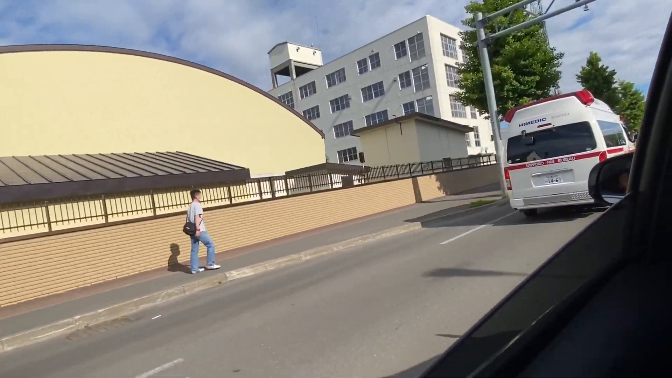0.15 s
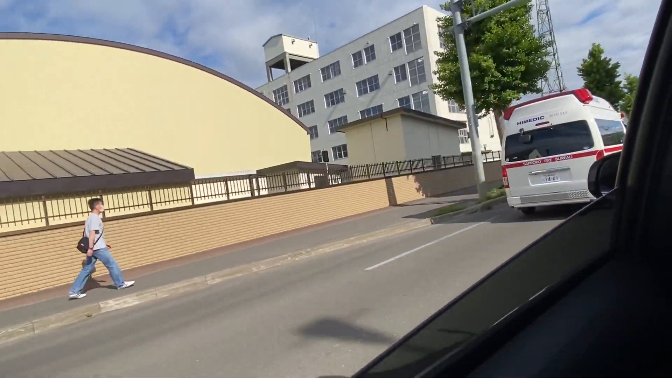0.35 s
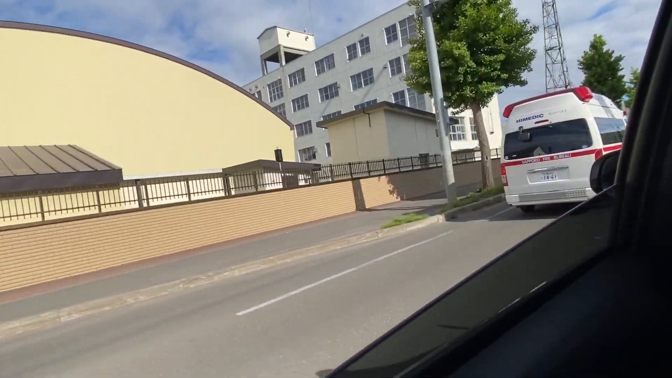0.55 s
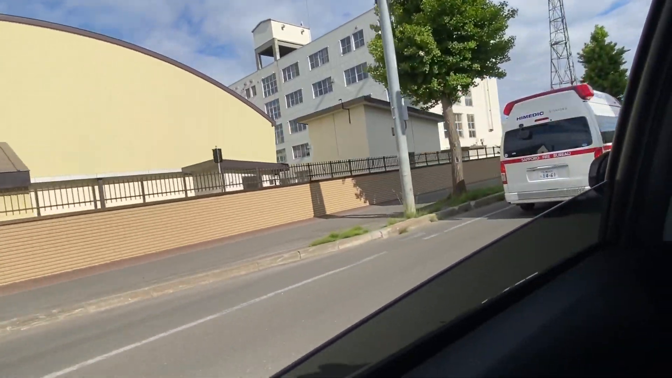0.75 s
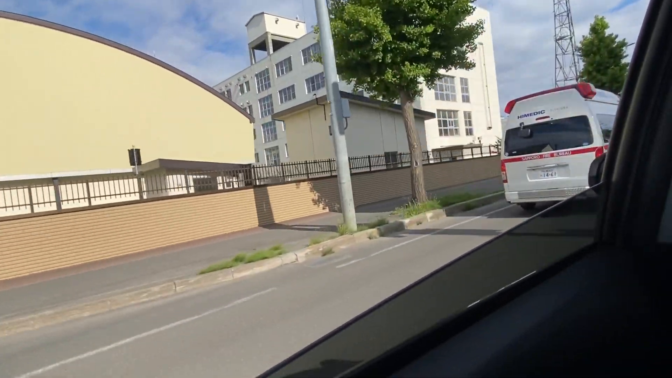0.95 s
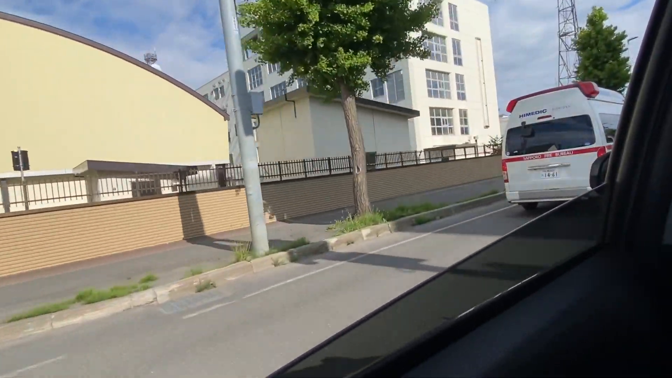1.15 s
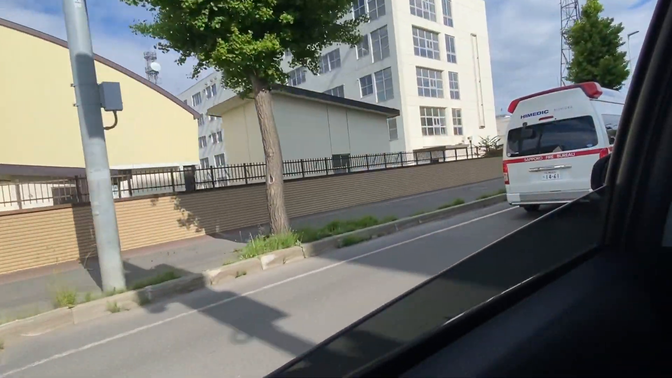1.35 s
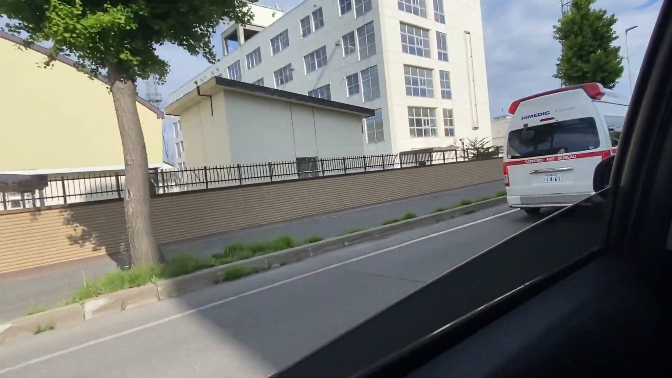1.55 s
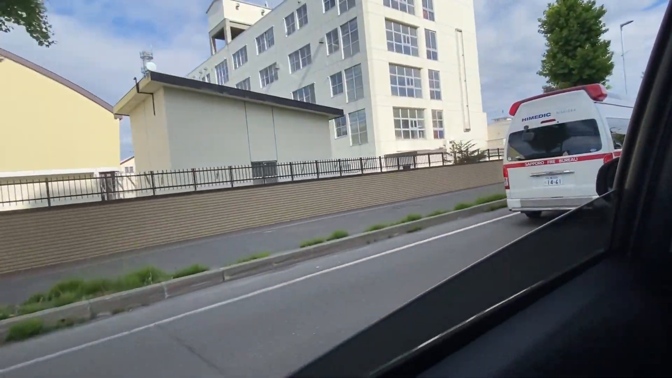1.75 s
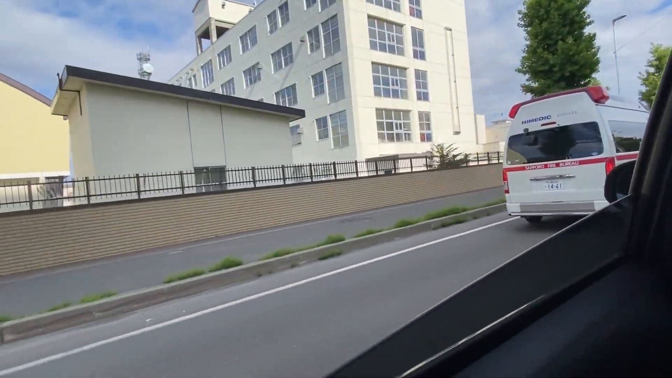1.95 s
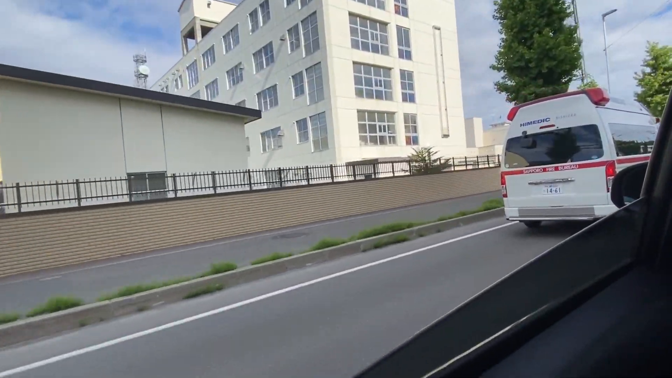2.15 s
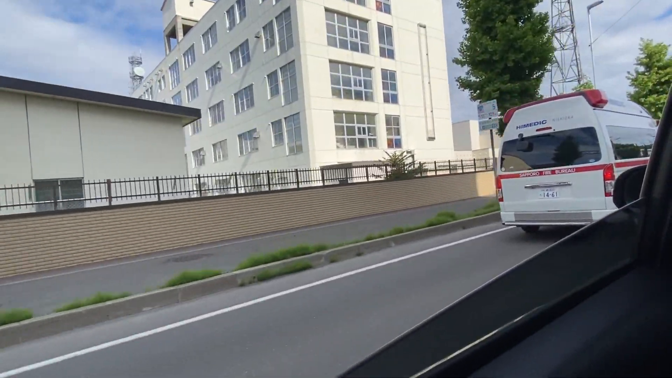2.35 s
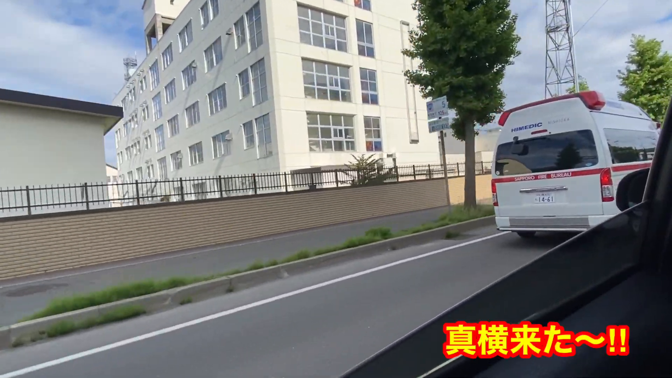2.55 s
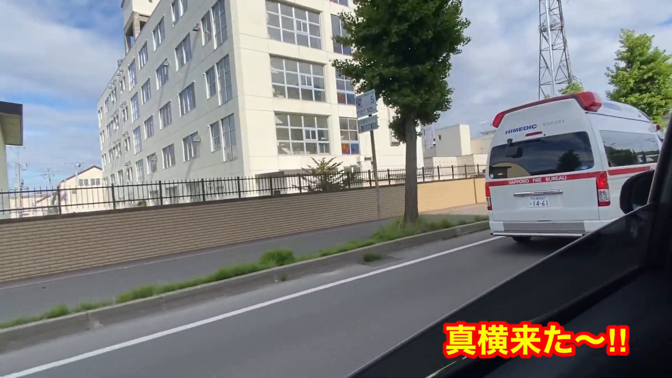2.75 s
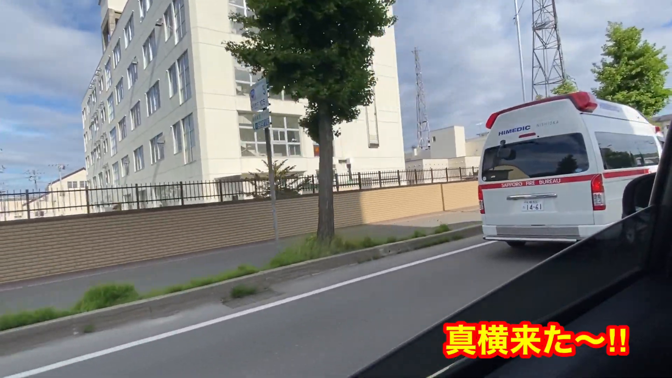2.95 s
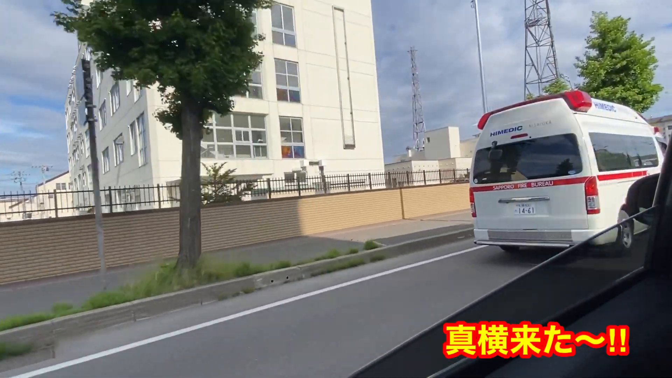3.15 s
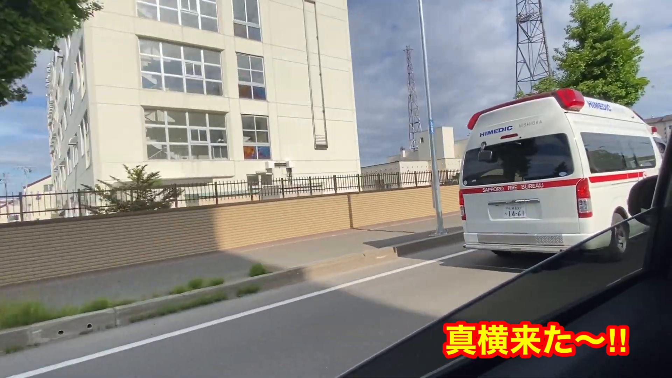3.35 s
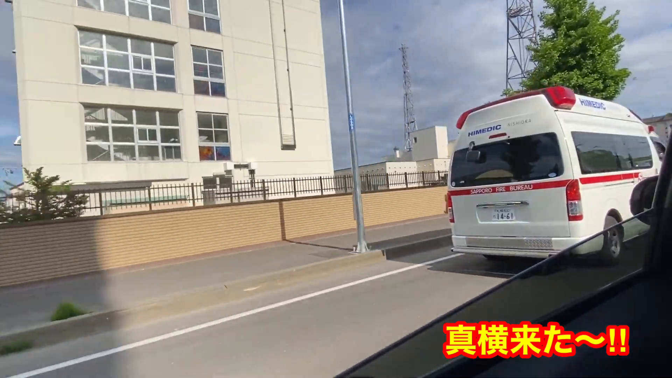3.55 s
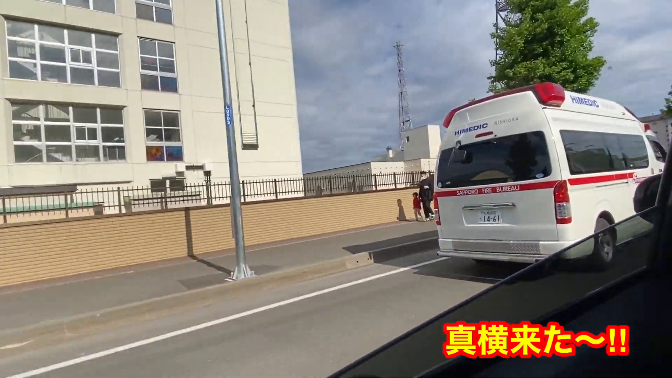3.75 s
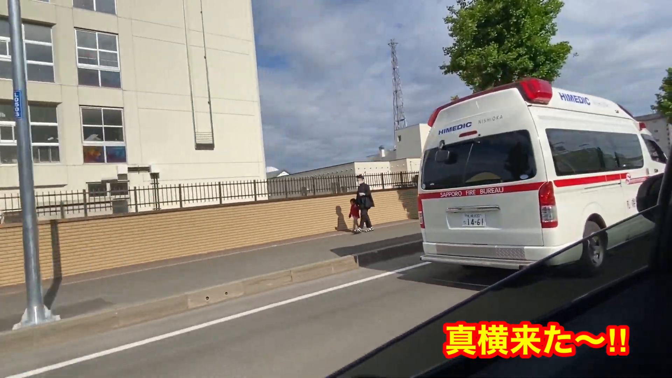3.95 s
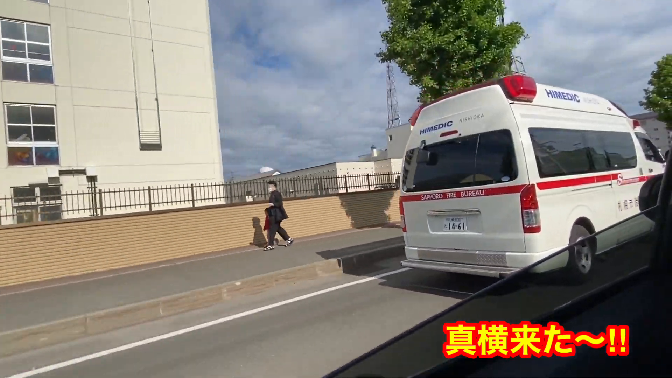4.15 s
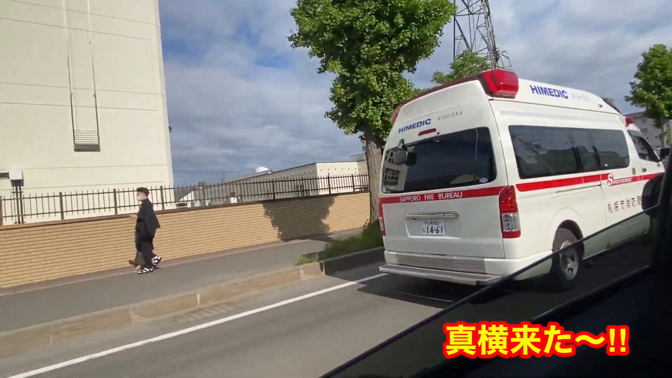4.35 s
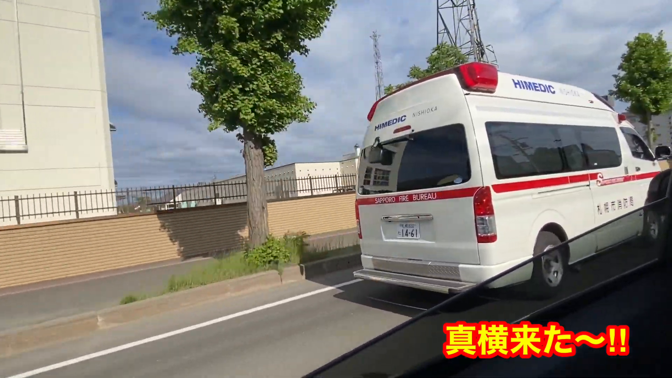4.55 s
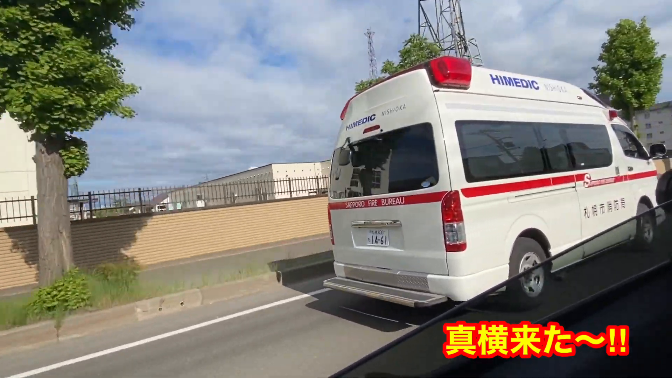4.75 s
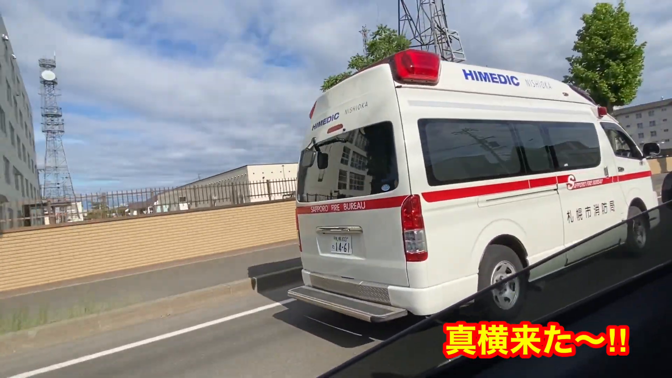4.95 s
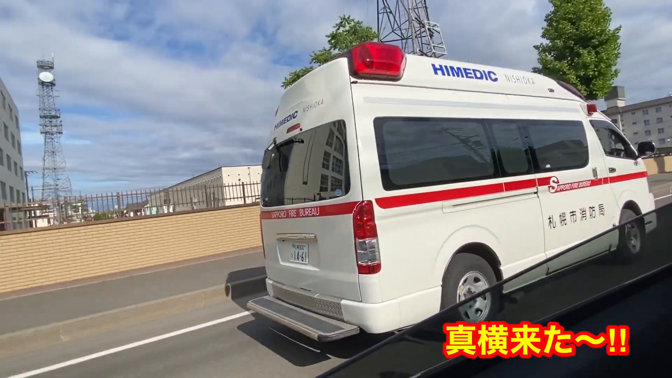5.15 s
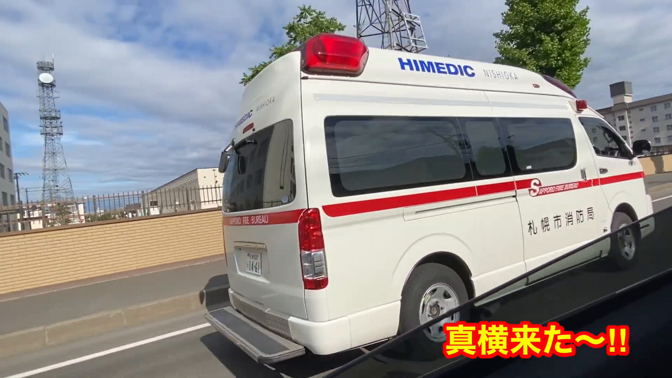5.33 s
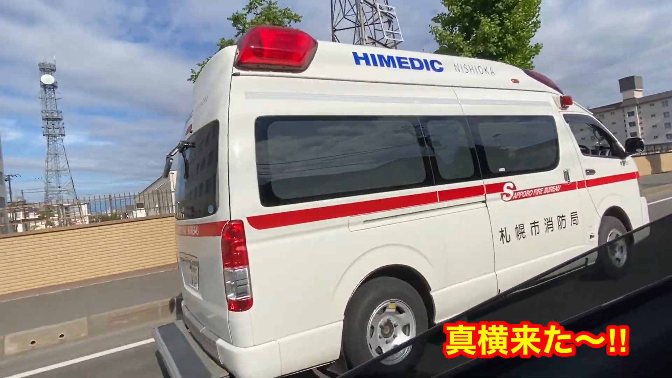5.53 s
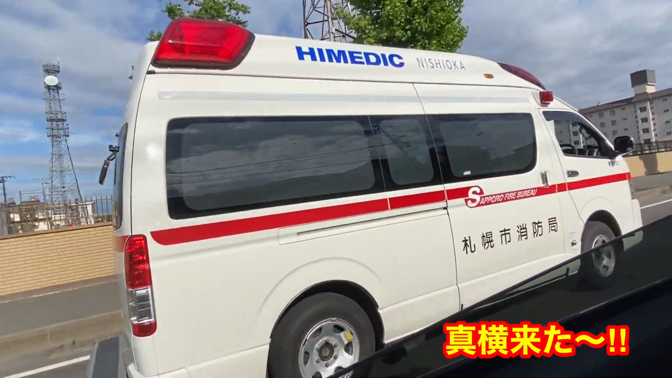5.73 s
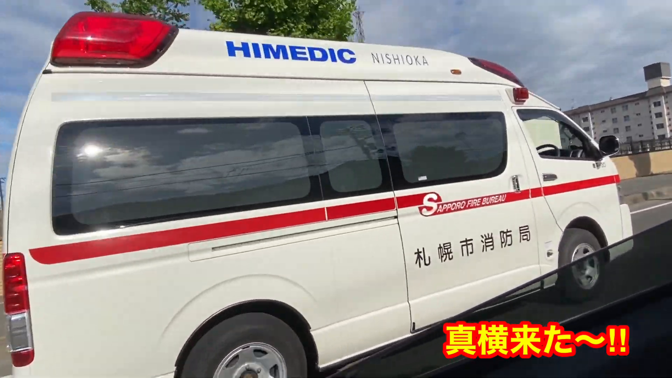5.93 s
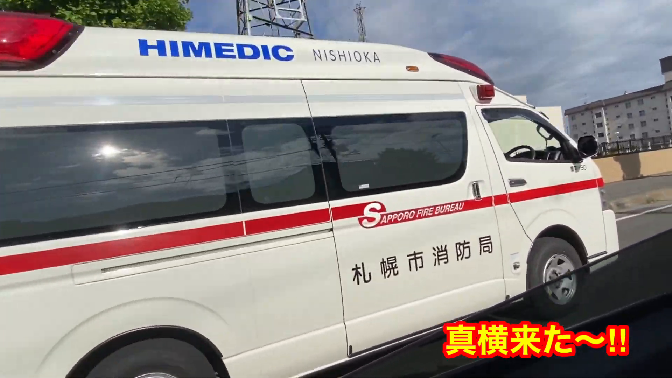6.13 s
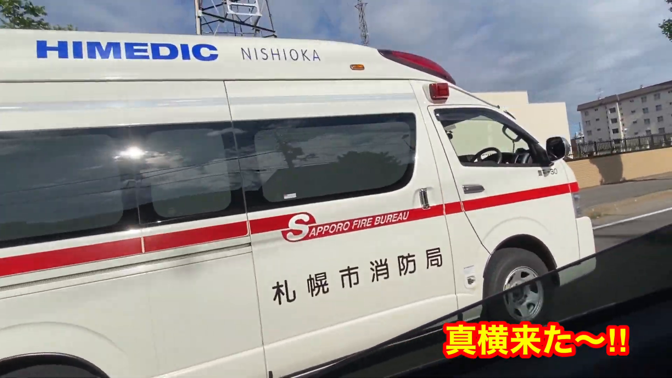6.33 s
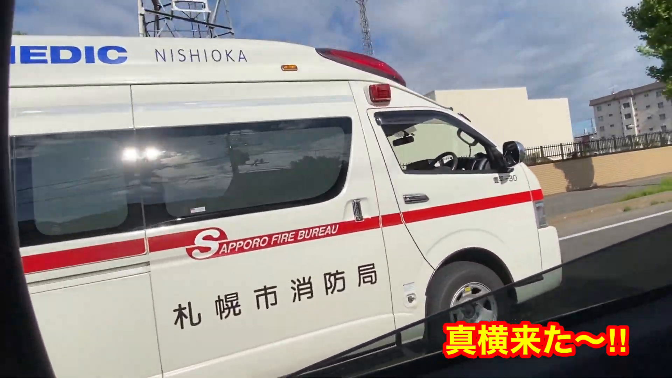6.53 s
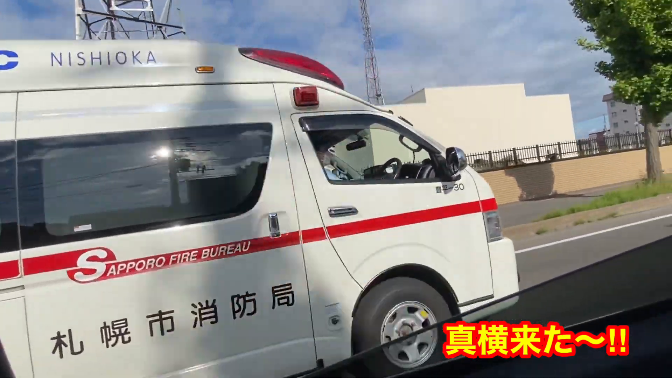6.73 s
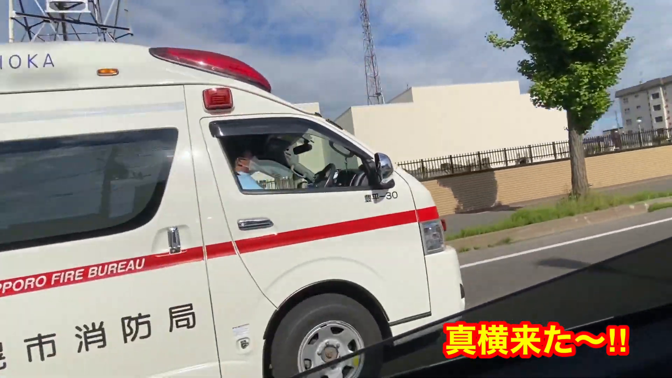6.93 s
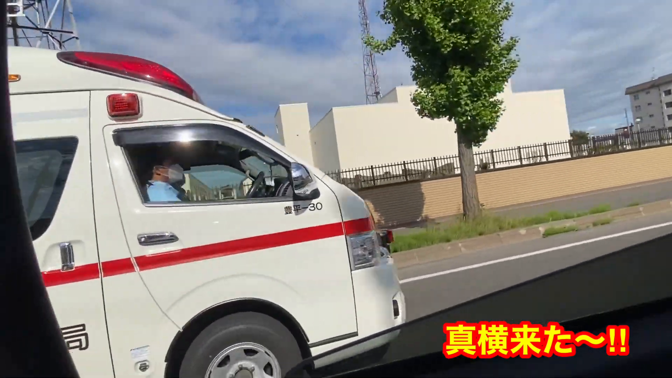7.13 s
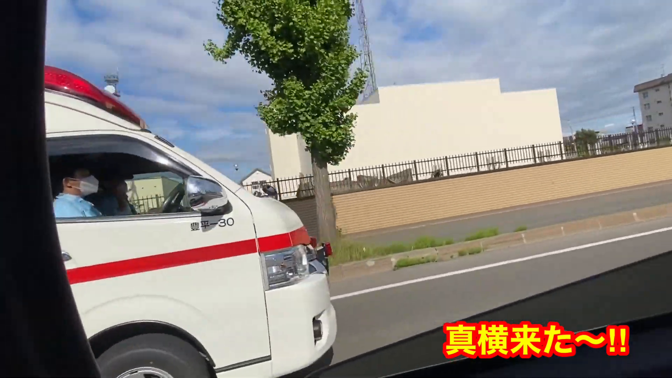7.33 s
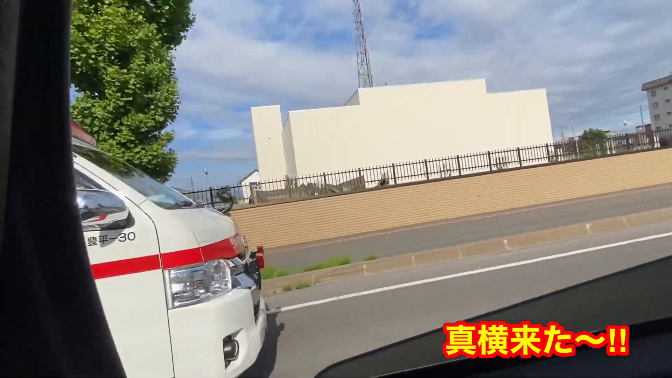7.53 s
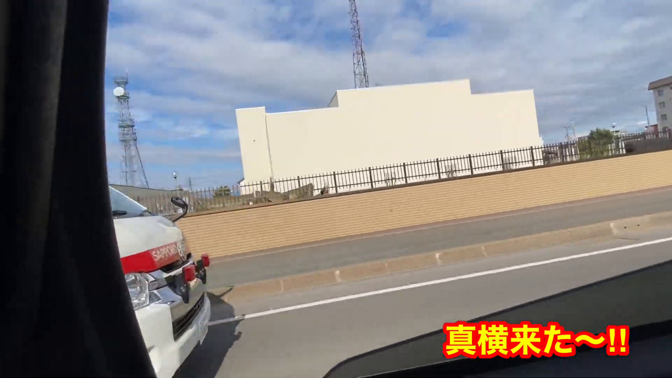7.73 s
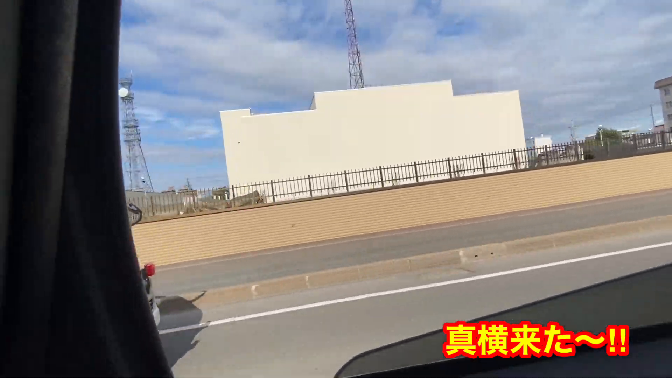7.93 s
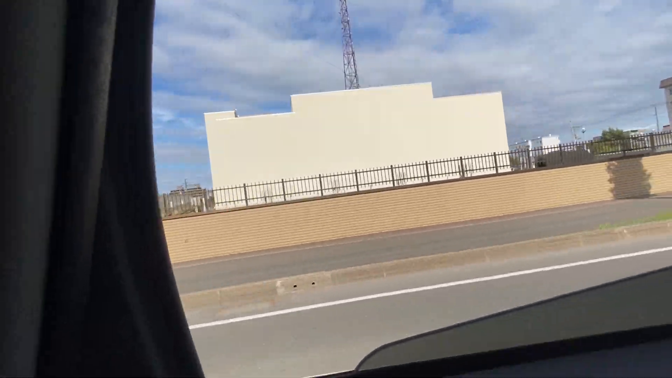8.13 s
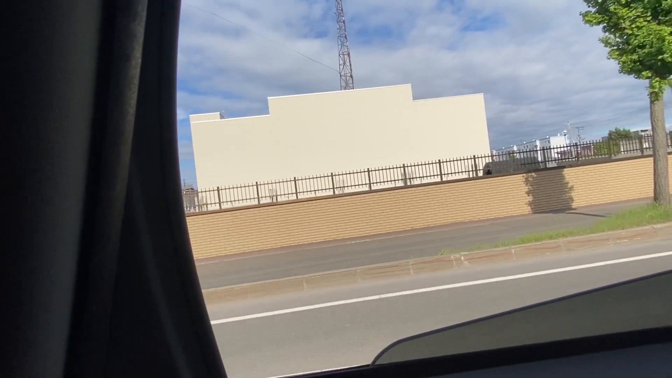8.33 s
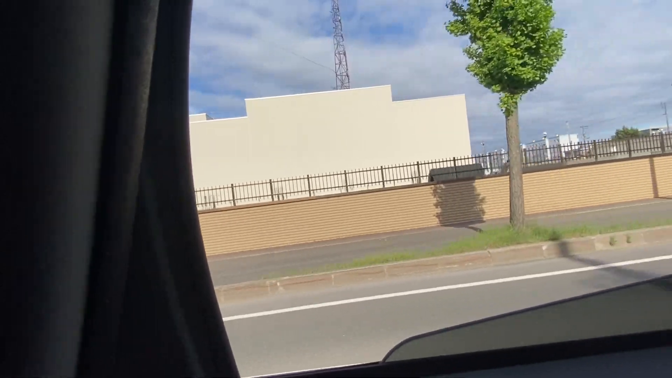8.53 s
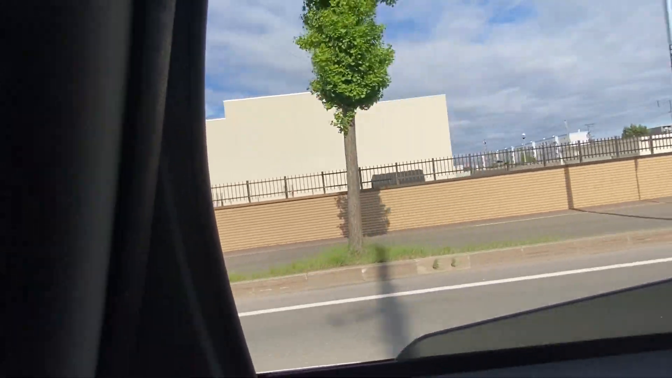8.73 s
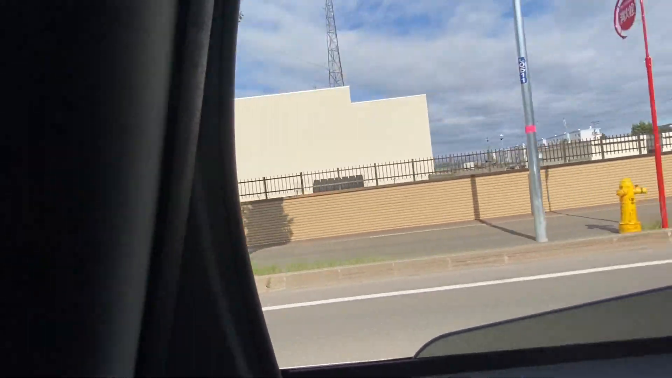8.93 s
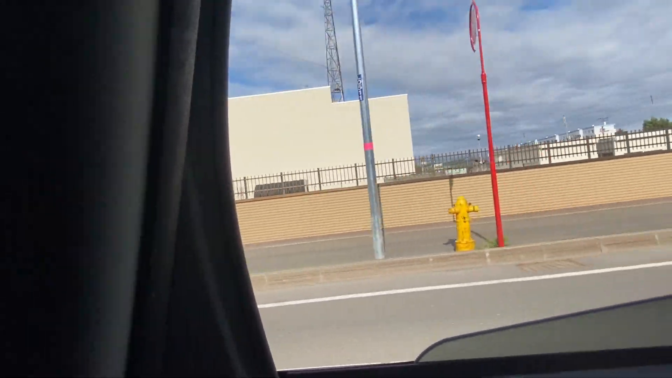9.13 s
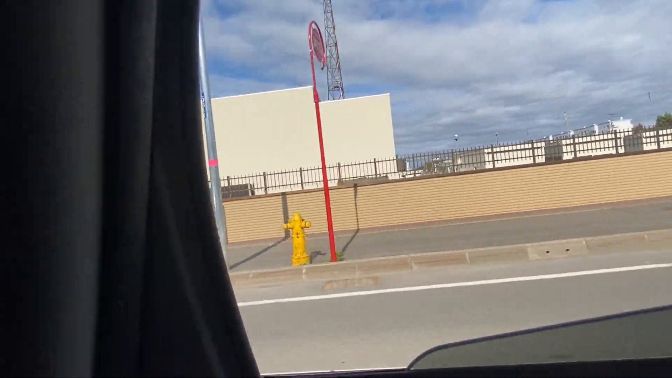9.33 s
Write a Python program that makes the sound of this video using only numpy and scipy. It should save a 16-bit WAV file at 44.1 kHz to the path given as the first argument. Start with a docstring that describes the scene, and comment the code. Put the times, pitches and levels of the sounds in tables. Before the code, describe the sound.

Wind buffets a microphone at a moving car's open window, popping and thudding over tyre roar as a passing van's hiss swells, then drops away.

```python
"""At the open side window of a moving car, on asphalt, while it overtakes a van.
Wind, made of shaped noise, buffets two microphone ports; gusts land with low thuds.
Short swirls of air pop and tick in the ports, over a crowd of smaller random pops.
Tyres roar as filtered noise with two stronger bands; the van's tyre hiss, also noise,
swells as it comes alongside, then drops away behind."""
import sys
import numpy as np
from scipy import signal
from scipy.fft import rfft, irfft, next_fast_len
from scipy.io import wavfile
from scipy.ndimage import uniform_filter1d

SR = 44100
rng = np.random.default_rng(int(sys.argv[2]) if len(sys.argv) > 2 else 0)


def dump_mix(stems):
    """Bounce the given channels to the path in sys.argv[1] as a 16-bit WAV at rate SR."""
    frames = np.atleast_2d(stems).T  # one column per channel
    limited = np.clip(frames, -1, 1)  # hard clip at full scale
    pcm = np.round(limited * 32767).astype(np.int16)
    wavfile.write(sys.argv[1], SR, pcm)


N = 413658  # length in samples

# Traffic over time: start_s, tyre_roar_db, tyre_hiss_db, top_fizz_db
TRAFFIC = [(0.0, -31.5, -46, -55.5), (1.4, -32.5, -42, -57), (2.4, -30.5, -42, -55),
           (3.8, -26.5, -40, -52.5), (4.6, -26.5, -38.5, -50), (5.2, -26, -36, -46), (5.75, -25, -35, -41),
           (6.24, -23.5, -33, -42), (6.45, -26.5, -38, -46.5), (7.0, -26, -40, -47), (7.7, -31, -44, -58),
           (8.4, -32, -48, -63)]
# Colour of the tyre roar: pitch_hz, relative_level_db
ROAR_COLOUR = [(150, -5.5), (450, -9.5), (850, 0.75), (1150, -5), (1550, -9.5), (2200, -19.5),
               (3200, -18.5), (5500, -68)]
# Colour of the van's tyre hiss: pitch_hz, relative_level_db
HISS_COLOUR = [(600, -20), (1500, 5.5), (2000, 7.5), (2800, -4.5), (3600, -2.5), (5000, -4.5), (8000, -14),
               (15500, -90)]
# Colour of the fizz at the top of the hiss: pitch_hz, relative_level_db
FIZZ_COLOUR = [(3000, 0), (7000, 4.5), (11000, 4), (14500, -2.5), (15800, -6)]
# Two bands that stand out of the roar, higher once the van is level:
# start_s, lower_centre_hz, lower_band_db, upper_band_db (both relative to the roar)
TREAD_BANDS = [(0, 898.8, -9, -12), (2.0, 880.8, -6.5, -11), (4.3, 950, -6.5, -36), (4.9, 1412, -13, -20),
               (5.6, 1438, -3, -12.5), (6.5, 1437, -13.5, -31), (9.38, 1385, -19, -25)]
# Tyre noise arriving a second time, inverted: start_s, extra_delay_ms, amplitude_share
SHORT_ECHO = [(0, 0.72, 0.23), (2.5, 0.44, 0.14), (6.2, 0.43, 0.17), (7.5, 0.32, 0.036), (9.38, 0.34, 0.3)]
# Slow strength of the wind on the ports: start_s, level_db
WIND_STRENGTH = [(0.0, -22), (0.9, -30.5), (1.3, -26.5), (1.75, -21.5), (2.5, -23), (3.1, -24.5),
                 (4.06, -22), (4.5, -19.5), (5.9, -20), (6.9, -22), (7.3, -25.5), (7.78, -24), (8.0, -20),
                 (8.28, -27.5), (8.45, -26), (9.38, -23.5)]
# Single gusts on top of it: peak_s, rise_above_wind_db
GUST_PEAKS = [(0.221, 4), (0.966, 6.5), (1.587, 5), (1.988, 4.5), (2.238, 1.5), (2.323, 5.5), (2.42, 4),
              (2.542, 10.5), (2.9, 3.5), (3.129, 7), (3.204, 7.5), (3.344, 6), (3.539, 11.5), (3.688, 5.5),
              (4.52, 4), (5.114, 1), (5.455, 6), (5.6, 7), (6.094, 2.5), (6.265, 8), (6.66, 5.5),
              (7.597, 8), (8.333, 8.5), (8.67, 3), (9.23, 2)]
# Colour of the wind's body: pitch_hz, relative_level_db
BUFFET_COLOUR = [(30, -9), (100, 1), (200, -4.5), (400, -9), (700, -23.5), (4000, -68)]
# Colour of the wind's deep rumble: pitch_hz, relative_level_db
RUMBLE_COLOUR = [(30, -12), (45, 4), (62, 7.5), (100, -3), (200, -15), (600, -74)]
# Loudest swirls that snap across the ports: centre_s, level_db, pitch_hz
LOUD_POPS = [(0.117, -8.5, 1200), (0.416, -10, 426), (0.698, -9, 780), (1.058, -5.5, 660),
             (1.779, -3.5, 770), (1.845, -8, 950), (2.112, -11, 790), (2.138, -9, 610), (2.2221, -8, 870),
             (2.316, -4, 414), (2.398, -7, 930), (2.419, -6, 880), (2.521, -4.5, 1000), (2.812, -2, 895),
             (2.828, -14, 1190), (2.893, -12, 900), (3.008, -13.5, 880), (3.19, -10, 940),
             (3.205, -10, 1100), (3.346, -8, 1100), (3.685, -3.5, 1030), (3.856, 0, 970), (4.201, -1, 684),
             (4.387, -4.5, 1350), (4.525, -4.5, 714), (4.628, -14, 950), (4.698, -18, 1000),
             (4.765, -4.5, 1040), (4.849, -9, 1200), (4.944, -4.5, 1160), (5.061, -7, 806),
             (5.133, -8, 960), (5.386, -7, 752), (5.679, -9, 1000), (5.745, -4.5, 480), (6.067, -9, 1000),
             (6.269, -6, 1150), (6.282, -8, 1200), (6.298, -12, 850), (6.316, -0.5, 960), (6.328, -2, 846),
             (6.363, -3, 696), (6.387, -3.5, 870), (6.433, -13, 950), (6.818, -4.5, 1170),
             (7.057, -10, 886), (7.073, -2.5, 1050), (7.082, -10, 1450), (7.212, -5.5, 1170),
             (7.421, -4.5, 567), (7.6085, -3, 1160), (7.627, -4, 1150), (7.933, -16, 1293),
             (7.973, -14, 1280), (8.1182, -5, 1240), (8.1211, -0.5, 960), (8.189, -10, 900),
             (8.211, -12, 1100), (8.366, -8.5, 1140), (8.3856, -3.5, 960), (8.421, -9.5, 1230),
             (8.439, -13, 1190), (8.872, -10.5, 1020), (9.201, -7.5, 1405)]
# Sharp ticks that reach into the treble: centre_s, level_db, pitch_hz
SHARP_TICKS = [(4.386, -15, 2400), (7.07, -17, 2600), (7.21, -15.5, 2585), (7.61, -28, 4000),
               (7.628, -28, 4500), (7.817, -18, 2300), (8.1206, -19, 3800), (8.366, -19, 2900),
               (8.3867, -19, 2800), (8.527, -31, 6500), (8.843, -24, 3500), (9.201, -19, 3500)]
# How late sound reaches the right port: pitch_hz, lag_radians
PORT_LAG = [(30, 0.88), (170, 0.93), (520, 2.75), (860, 4.22), (2000, 4.48), (3000, 8.7), (6000, 15.9)]
# How alike the two ports sound: pitch_hz, likeness_0_to_1
PORT_LIKENESS = [(40, .35), (250, .3), (550, .75), (1000, .6), (1500, .3), (6500, .3), (9000, .8),
                 (15000, .88)]
# Level of the right port against the left: pitch_hz, level_db
RIGHT_PORT_SHADE = [(35, -8), (100, -4.5), (700, -3.5), (1800, -.5), (2500, -2.5), (3100, -7), (6000, -4),
                    (9000, 0)]

HOP, FRAME = 128, 512  # samples, for noise patches in time and pitch
TREAD_RATIO = 2.18  # pitch of the upper tread band over the lower
GUST_RISE_S, GUST_FALL_S = 0.011, 0.025
CALM_DB, RUMBLE_GROWTH = -23, 1.16  # the rumble grows faster than the wind around this level
THUD_HZ = 74.5
EDGE_TICK_DB = -14.5  # faint tick on every loud pop, against the pop's level
HALF = 400  # samples on each side of a pop's centre
TOP_HZ = 15900  # upper limit of the sound


def amp(db):
    """Turn decibels into a plain multiplier."""
    return 10 ** (np.asarray(db) / 20)


def evened(x):
    """Bring the average strength (rms) to 1."""
    return x / np.sqrt(np.mean(x ** 2) + 1e-20)


def read(points, hz):
    """Read a pitch table, in straight lines along log pitch."""
    table_hz, value = np.transpose(points)
    return np.interp(np.log(hz + 1), np.log(table_hz + 1), value)


def follow(rows, column):
    """Follow one column of a time table, sample by sample."""
    table = np.transpose(rows)
    return np.interp(np.arange(N) / SR, table[0], table[column])


def drift(seconds):
    """Smooth random wander, rms 1, from noise averaged twice over the given time."""
    size = max(round(seconds * SR), 2)
    once = uniform_filter1d(rng.standard_normal(N), size)
    return evened(uniform_filter1d(once, size))


def coloured(spectrum, patchy_db):
    """Two noises of one colour, rms 1 together, sharing drifting patches in time and pitch."""
    hz = np.fft.rfftfreq(N, 1 / SR)
    noise = irfft(rfft(rng.standard_normal((2, N))) * amp(read(spectrum, hz)), N)
    frames = signal.stft(noise, nperseg=FRAME, noverlap=FRAME - HOP)[2]
    patches = uniform_filter1d(rng.standard_normal(frames.shape[1:]), 8, 0)  # smooth over pitch
    patches = evened(uniform_filter1d(patches, 14, 1))  # smooth over time
    patchy = signal.istft(frames * amp(patchy_db * patches), nperseg=FRAME, noverlap=FRAME - HOP)[1]
    return evened(patchy[:, :N])


def late(hz):
    """Phase lag, in radians, of sound that reaches the right port late."""
    return read(PORT_LAG, hz)


def early(hz):
    """Phase lead for hiss from across the street, which strikes the right port first."""
    lead_s = 0.00026
    return -(2 * np.pi * (hz - 9300) * lead_s + np.pi)


def ports(left, other, lag):
    """The right port hears part of the left sound, shifted by lag(hz), and part of its own."""
    size = next_fast_len(N + SR // 10)
    hz = np.fft.rfftfreq(size, 1 / SR)
    same = np.clip(read(PORT_LIKENESS, hz), 0, 1)
    shared = same * rfft(left, size) * np.exp(-1j * lag(hz))
    own = np.sqrt(1 - same ** 2) * rfft(other, size)
    right = irfft((shared + own) * amp(read(RIGHT_PORT_SHADE, hz)), size)[:N]
    return np.array([left, right])


def echoed(pair):
    """A short inverted echo at the left port combs its noise into drifting bands."""
    at = np.arange(N)
    delay = follow(SHORT_ECHO, 1) * SR / 1000  # in samples
    echo = np.interp(at - delay, at, pair[0])
    return pair - np.array([follow(SHORT_ECHO, 2) * echo, np.zeros(N)])


def tread():
    """Two bands of the roar: low noise shifted up to moving centre pitches."""
    turn = 2 * np.pi * np.cumsum(follow(TREAD_BANDS, 1)) / SR
    out = 0
    # the cutoff of the low noise is half the width of its band
    for column, ratio, cutoff_hz in [(2, 1, 140), (3, TREAD_RATIO, 330)]:
        lowpass = signal.butter(4, cutoff_hz, fs=SR, output="sos")
        low = signal.sosfilt(lowpass, rng.standard_normal((2, 2, N)))
        band = low[0] * np.cos(ratio * turn) + low[1] * np.sin(ratio * turn)
        out = out + amp(follow(TREAD_BANDS, column)) * evened(band)
    return out


def tyre_roar(flutter):
    """Roar of the asphalt under both vehicles: patchy noise plus the two tread bands."""
    roar = echoed(ports(*coloured(ROAR_COLOUR, patchy_db=2.0), late))
    roar = roar + ports(*tread(), late)
    return amp(follow(TRAFFIC, 1) + .6 * flutter) * roar


def van_hiss():
    """Tyre hiss of the van: noise whose treble fizz opens up when the van is close."""
    hiss = echoed(ports(*coloured(HISS_COLOUR, patchy_db=1.36), late))
    fizz = ports(*coloured(FIZZ_COLOUR, patchy_db=.8), early)
    fizz_db = follow(TRAFFIC, 3) + 1.17 * drift(0.0096)
    return amp(follow(TRAFFIC, 2)) * hiss + amp(fizz_db) * fizz


def gusting():
    """Wind level in dB: the slow curve, and each gust rising quickly and dying away."""
    t = np.arange(N) / SR
    level_db = follow(WIND_STRENGTH, 1)
    for s, db in GUST_PEAKS:
        width_s = np.where(t < s, GUST_RISE_S, GUST_FALL_S)
        level_db = level_db + db * np.exp(-((t - s) / width_s) ** 2)
    return level_db


def turbulence():
    """Quick unrest of the air, rms 1: a wander with deep lulls and flat tops, swelling at loud pops."""
    t = np.arange(N) / SR
    coarse_t = t[::64]
    swells = sum(np.exp(-.5 * ((coarse_t - s - .006) / 0.0083) ** 2) for s, *_ in LOUD_POPS)
    swells = np.interp(t, coarse_t, np.minimum(swells, 1))
    wander = drift(0.017)
    lopsided = wander - 0.32 * (wander ** 2 - 1)
    return evened(0.98 * lopsided + 0.37 * evened(swells - swells.mean()))


def buffet(flutter, gust_db):
    """Lumpy low wind noise: a deep rumble on the gusts, and a body that also flutters between them."""
    deep_db = CALM_DB + RUMBLE_GROWTH * (gust_db - CALM_DB)
    rumble_db = deep_db + 1.5 + 2.94 * drift(0.065)
    rumble = amp(rumble_db) * ports(*coloured(RUMBLE_COLOUR, patchy_db=0.5), late)
    body_db = gust_db + 2.0 + 2.0 * flutter
    return rumble + amp(body_db) * ports(*coloured(BUFFET_COLOUR, patchy_db=3.0), late)


def thuds(gust_db):
    """Each gust lands with one slow swirl of air: a low wave that swells and fades at its peak."""
    hits = np.zeros(N)
    hits[np.round(np.transpose(GUST_PEAKS)[0] * SR).astype(int)] = 1
    u = np.arange(-1500, 1501) / SR * THUD_HZ  # time in turns of the wave
    thud = np.exp(-.5 * (u / 1.07) ** 2) * np.sin(2 * np.pi * u)
    out = signal.oaconvolve(hits * amp(gust_db), thud, "same")
    return ports(out, out, late)


def eddy(hz, turns):
    """One swirl of air: a push, a deeper suck and a short rebound, sagging in pitch."""
    u = np.arange(-HALF, HALF) / SR * hz
    return -np.exp(-.5 * (u / turns) ** 2) * np.cos(2 * np.pi * (u - 0.1 * u ** 2) - .6)


def crowd(flutter, gust_db):
    """A clumped crowd of small pops that grows with the gusts, partly separate at each port."""
    strength = amp(gust_db + 4.45 * flutter - 3.5)
    out = 0
    for hz in np.geomspace(260, 1300, num=8):
        size = amp(2.17 * np.minimum(rng.exponential(1, (2, N)), 3))
        hits = size * (rng.random((2, N)) < 44. / SR)  # about 44 pops a second at each of the eight pitches
        level = strength * (hz / 500) ** -.2  # higher pops are a little weaker
        out = out + signal.oaconvolve(hits * level, eddy(hz, turns=0.69)[None], "same")
    return ports(*out, late)


def pops():
    """Loud pops, each snapping one way or the other in ragged air, and ticks, duller at the right port."""
    out = np.zeros(N + 2 * HALF)
    t = np.arange(-HALF, HALF) / SR
    wake = np.exp(-.5 * ((t - 0.0008) / 0.0018) ** 2)  # the air is ragged for a few ms around
    for s, db, hz in LOUD_POPS:
        air = rng.standard_normal(2 * HALF)
        at = round(s * SR)
        pop = eddy(hz, turns=0.61)
        pop += 0.53 * eddy(0.31 * hz, turns=0.13)  # low thump under it
        pop += amp(EDGE_TICK_DB) * eddy(1.74 * hz, turns=0.25)
        ragged = evened(signal.fftconvolve(air, eddy(0.82 * hz, turns=0.42), "same"))
        pop += 0.36 * wake * ragged
        out[at:at + 2 * HALF] += amp(db) * np.sign(air[0]) * pop
    for s, db, hz in SHARP_TICKS:
        at = round(s * SR)
        out[at:at + 2 * HALF] += amp(db) * eddy(hz, turns=0.38)
    left = out[HALF:N + HALF]
    hz = np.fft.rfftfreq(N, 1 / SR)
    # the sharp edge stays at the left port
    dull = amp(read(RIGHT_PORT_SHADE, hz) - 2.0) / (1 + (hz / 1700) ** 4)
    right = irfft(rfft(left) * dull * np.exp(-1j * late(hz)), N)
    return np.array([left, right])


def scene():
    """Add tyres, wind and pops; one flutter and one gust curve tie the layers together."""
    flutter, gust_db = turbulence(), gusting()
    road = tyre_roar(flutter) + van_hiss()
    wind = buffet(flutter, gust_db) + thuds(gust_db)
    return road + wind + crowd(flutter, gust_db) + pops()


def record(dry):
    """A bass cut, a soft overload that rounds off the loudest peaks, then a treble limit."""
    thin = signal.sosfilt(signal.butter(2, 24, "high", fs=SR, output="sos"), dry)
    bent = thin / (1 + thin ** 4) ** (1 / 4)
    lowpass = signal.firwin(511, TOP_HZ, window=("kaiser", 9), fs=SR)
    return signal.oaconvolve(bent, lowpass[None], "same")


dry = scene()
out = record(dry)
dump_mix(out)
```